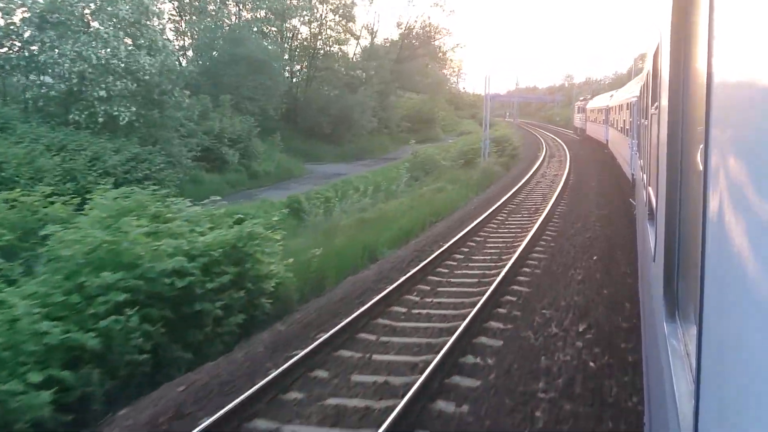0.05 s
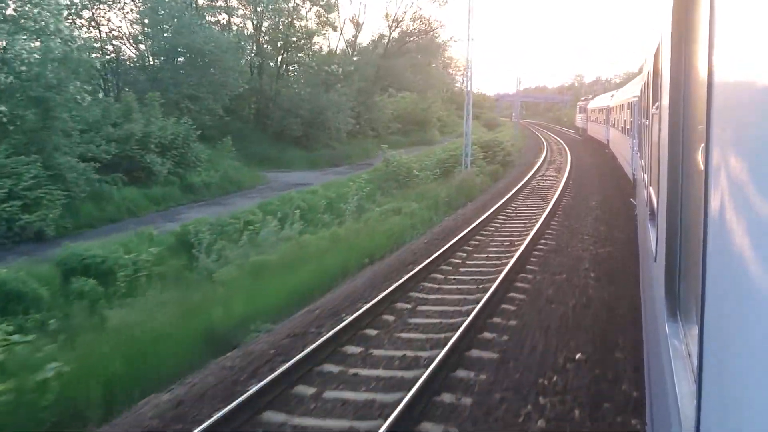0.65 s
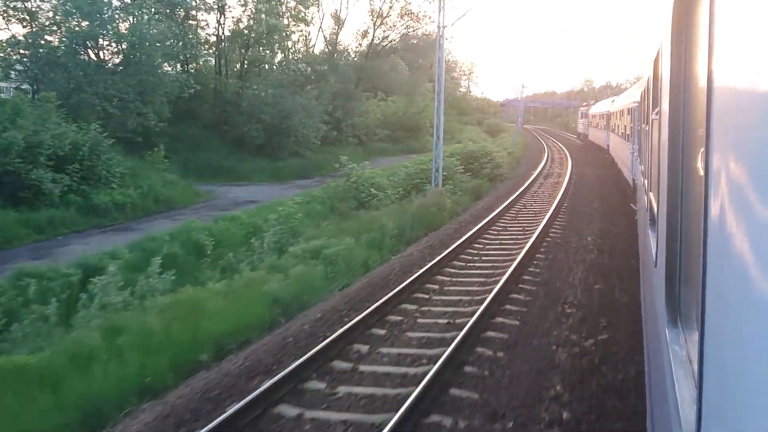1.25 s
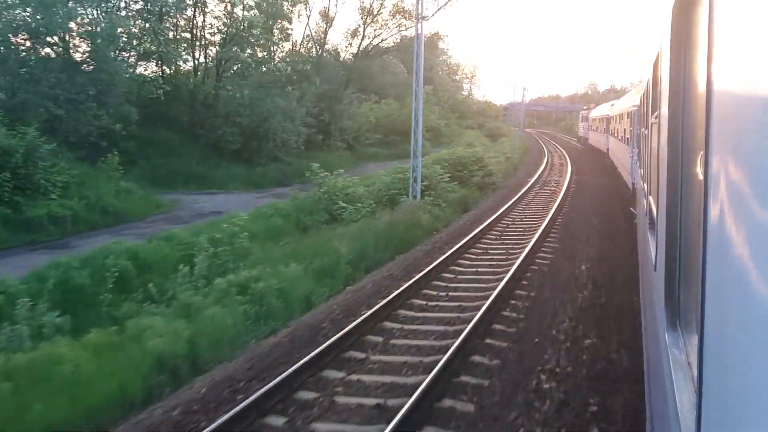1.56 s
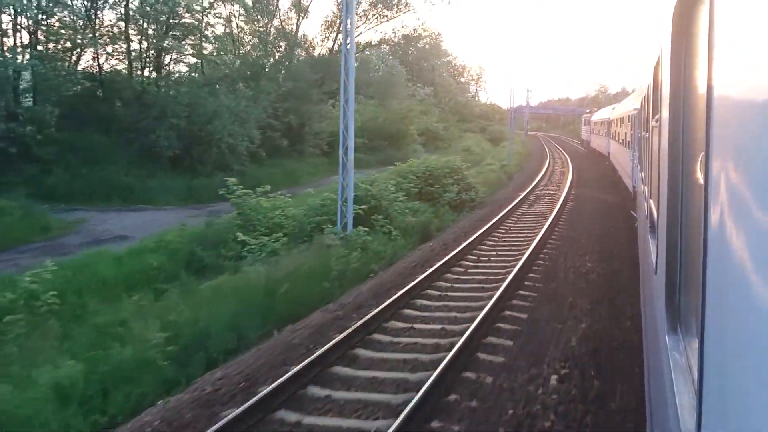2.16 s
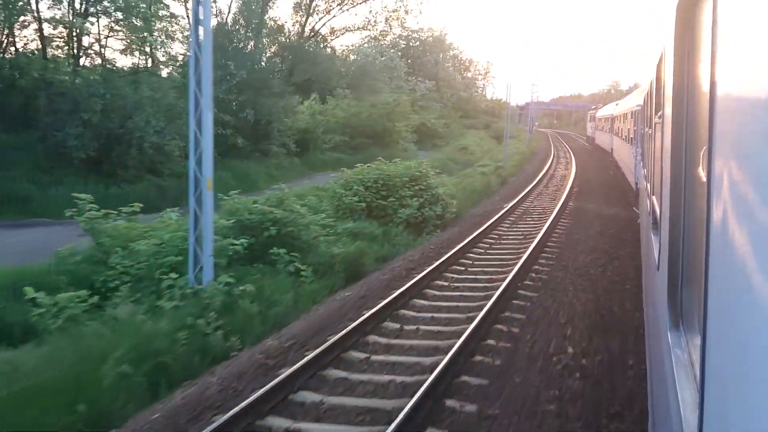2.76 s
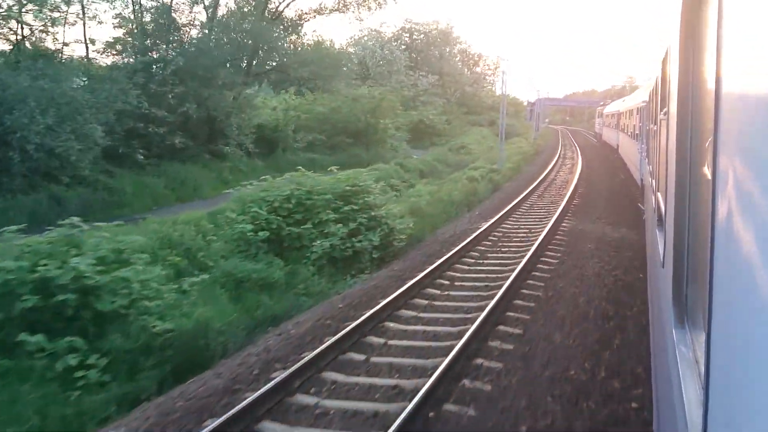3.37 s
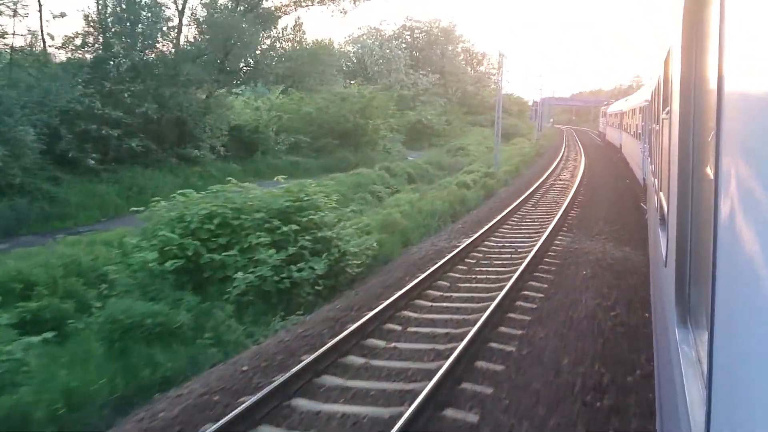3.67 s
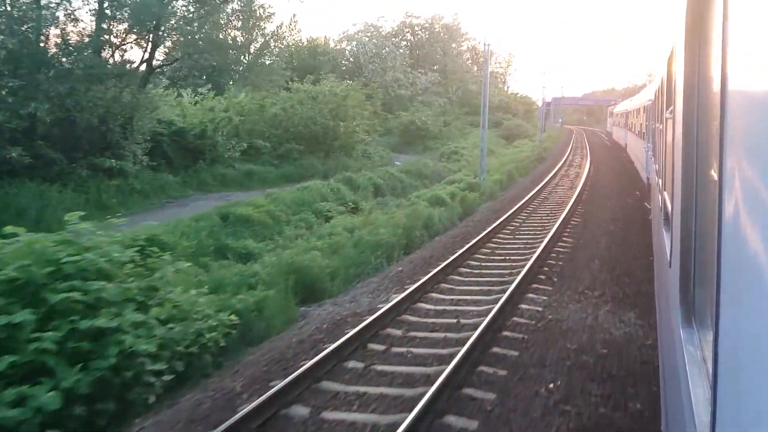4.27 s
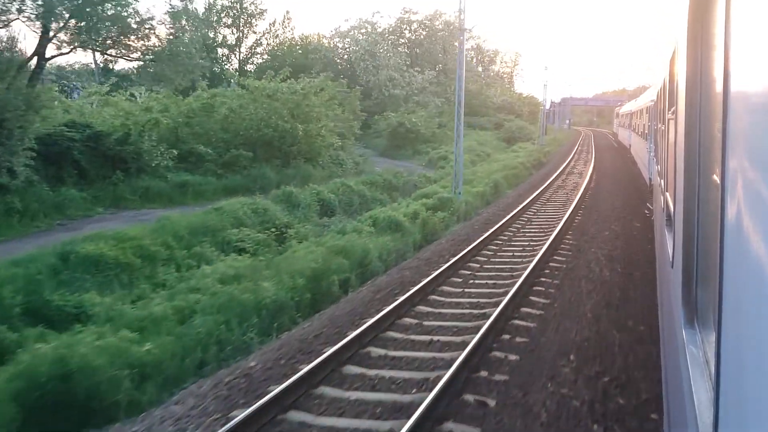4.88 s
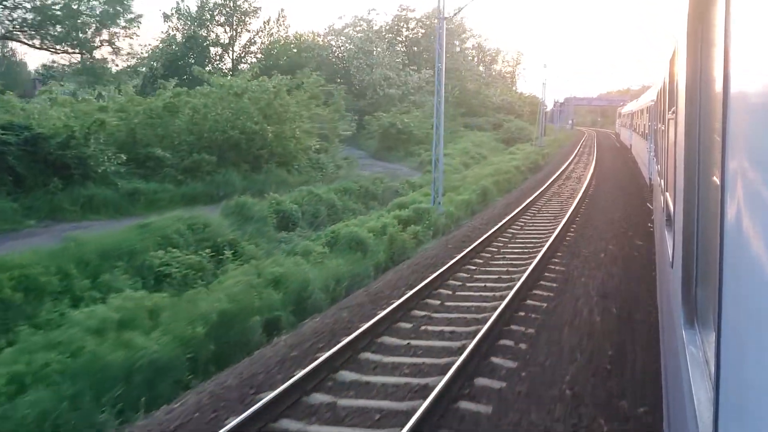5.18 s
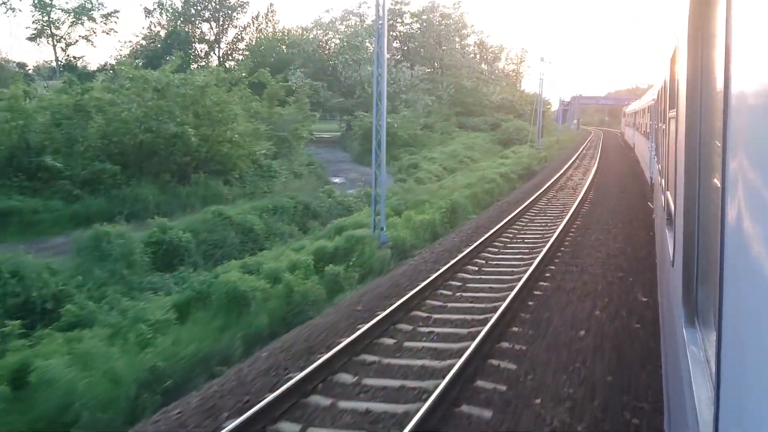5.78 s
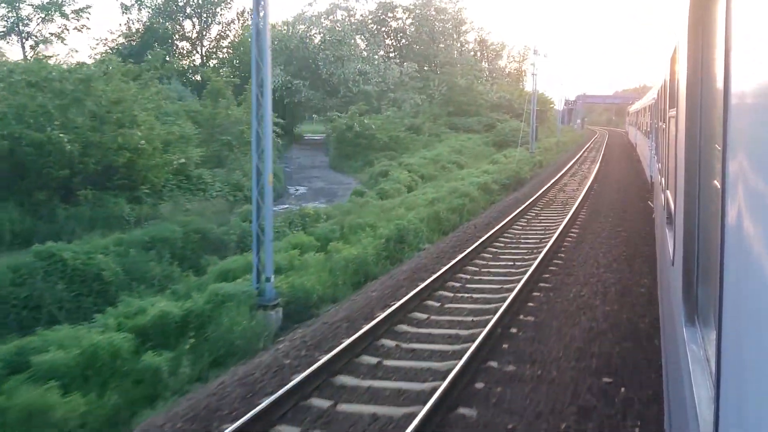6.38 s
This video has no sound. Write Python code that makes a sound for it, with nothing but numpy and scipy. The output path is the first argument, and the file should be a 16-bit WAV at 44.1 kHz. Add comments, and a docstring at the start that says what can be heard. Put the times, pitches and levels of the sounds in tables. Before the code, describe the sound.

Wind hits a microphone at an open train window in rapid, rumbling gusts and sharp slaps, strong on the left and much weaker on the right. Underneath, the train runs along the track with a continuous roar, hiss and slight ringing of wheels on rails. Toward the end a soft, wavering wheel tone rises, and a wheel rim brushes the rail twice with a faint sizzle.

```python
"""At the open window of a passenger train, rolling steadily through a curve.
The wheels roar and hiss on the rails and ring at their own pitches. Near the end one wheel sings softly,
and a flange (a wheel's guiding rim) brushes the rail with two faint, high sizzles.
Over it all, quick gusts thump, tear and slap at the left microphone of a camera held outside.
The right microphone is sheltered and catches only weaker swirls and puffs of air."""
import sys
import numpy as np
from scipy import signal
from scipy.fft import rfft, irfft, next_fast_len
from scipy.io import wavfile
from scipy.ndimage import uniform_filter1d, map_coordinates

SR = 44100
rng = np.random.default_rng(int(sys.argv[2]) if len(sys.argv) > 2 else 0)


def master(y):
    """Save y as 16-bit WAV."""
    cut = np.clip(np.atleast_2d(y).T, -1, 1)
    pcm = np.round(cut * 32767)  # scale
    wavfile.write(sys.argv[1], SR, pcm.astype(np.int16))


N = 292362
TIME = np.arange(N) / SR


def amp(db):
    """Turn decibels into a number to multiply by."""
    return 10 ** (np.asarray(db) / 20)


def unit(x):
    """Scale a signal to an average strength (rms) of 1."""
    return x / np.sqrt(np.mean(x ** 2) + 1e-20)


def along(points, hz):
    """Read between (frequency, value) points, giving each octave equal room."""
    freqs, values = np.transpose(points)
    return np.interp(np.log(hz + 1), np.log(freqs + 1), values)


def curves(rows):
    """Turn each column after the time into one value per sample."""
    times, *columns = np.transpose(rows)
    return [np.interp(TIME, times, column) for column in columns]


def bell(x, centre, width):
    """A smooth bump of height 1, down to about a third at one width from its centre."""
    return np.exp(-np.minimum(((x - centre) / width) ** 2, 20))


def wobble(rate):
    """A smooth curve through `rate` random values a second."""
    coarse = TIME[::16]
    points = rng.standard_normal(int(N * rate / SR) + 4)
    return np.interp(TIME, coarse, map_coordinates(points, [coarse * rate]))


def filtered(x, response):
    """Turn each frequency of x up or down by response(hz)."""
    size = next_fast_len(N + SR // 4)
    return irfft(rfft(x, size) * response(np.fft.rfftfreq(size, 1 / SR)), size)[..., :N]


def noise(spectrum):
    """Noise of strength 1 with the given tone colour."""
    return unit(filtered(rng.standard_normal(N), lambda hz: amp(along(spectrum, hz))))


def swirls(spectrum, span_s):
    """Swirling air: noise whose strength is evened out over span_s seconds."""
    air = noise(spectrum)
    size = max(int(span_s * SR), 2)
    power = uniform_filter1d(uniform_filter1d(air ** 2, size), size)
    return unit(air / np.sqrt(np.abs(power) + 0.076))


def arrival(spectrum, shares, lead_s):
    """Noise that both microphones hear, the left one lead_s sooner (later if negative)."""
    delay = lambda hz: np.exp(-1j * np.pi * hz * lead_s * np.array([[-1], [1]]))
    gain = lambda hz: amp(along(spectrum, hz)) * np.sqrt(np.abs(along(shares, hz)))
    return filtered(rng.standard_normal(N), lambda hz: gain(hz) * delay(hz))


# Wheel noise that comes straight, or bounces off the coach: (frequency [Hz], share of power [0-1])
STRAIGHT_SHARE = [(300, 0.52), (700, 0.72), (1200, 0.98), (1550, 0.53), (1900, 0.17), (2500, 0.49),
                  (3200, 0.13), (4500, 0.033)]
BOUNCED_SHARE = [(1800, 0.024), (2400, 0.074), (3600, 0.23), (4500, 0.26), (7000, 0.13), (11000, .03)]

def at_microphones(spectrum):
    """Stereo noise that arrives three ways: straight, bounced, and scattered from all around."""
    rest = lambda hz: np.clip(1 - along(STRAIGHT_SHARE, hz) - along(BOUNCED_SHARE, hz), 0, 1)
    white = rng.standard_normal((2, N))
    scattered = filtered(white, lambda hz: amp(along(spectrum, hz)) * np.sqrt(rest(hz)))
    straight = arrival(spectrum, STRAIGHT_SHARE, lead_s=-0.000058)
    bounced = arrival(spectrum, BOUNCED_SHARE, lead_s=0.000451)
    return unit(scattered + straight + bounced)


# Pitches at which wheels and rails ring: (pitch [Hz], width [Hz], typical boost [dB])
WHEEL_RINGS = [(479, 72.4, 3.5), (675, 33, 6), (1100, 39.2, 4), (1543, 43, 5.5), (1675, 68, 3.5),
               (1920, 47, 1.5), (2156, 35, 5), (2300, 55, 1.5), (2714, 120, 2), (3460, 100, 2),
               (3860, 150, 3), (4220, 84, 3.5), (4870, 170, 2)]

def ringing(rush, shimmer_db=3, swells_per_s=7):
    """Wheels and rails boost narrow bands of the noise; each band swells and fades on its own."""
    size = next_fast_len(N + SR // 4)
    spectrum, hz = rfft(rush, size), np.fft.rfftfreq(size, 1 / SR)
    ring = 0
    for centre, width, db in WHEEL_RINGS:
        band = irfft(spectrum * bell(hz, centre, width), size)[:, :N]
        ring = ring + (amp(db) - 1) * band * unit(amp(shimmer_db * wobble(swells_per_s)))
    return ring


# Sudden drops in the rolling noise: (time [s], depth [dB])
ROLLING_DIPS = [(0.02, 3), (0.425, 5.5), (1.78, 6.5), (2.31, 4.5), (2.501, 1.5), (3.06, 2.5), (3.44, 5),
                (3.87, 2), (4.19, 3.5), (4.57, 1.5), (5.545, 7), (6.18, 2)]

def dip_db(fall_s=0.01, recover_s=0.61):
    """The level drops quickly and creeps back; close dips pile up."""
    return -sum(depth * np.clip((TIME - start) / fall_s, 0, 1) * np.exp(-np.abs(TIME - start) / recover_s)
                for start, depth in ROLLING_DIPS)


# How loud the rolling is, before the dips: (time [s], relative level [dB])
ROLLING_LEVEL = [(0, -33), (0.4, -31.5), (0.6, -30.5), (1.5, -31.5), (1.85, -31.5), (2.25, -31.2),
                 (2.9, -31), (3.35, -32), (4.3, -34.5), (5.1, -35.5), (5.5, -34.5), (5.9, -35), (6.6, -35)]
# How its tone shifts along the curve: (time [s], amount of ringing [x], roar [dB], treble [dB])
ROLLING_TONE = [(0, 0.26, -2, -1), (0.9, 1.44, -0.5, 1.5), (1.6, 0.83, -3.5, 0.5), (2.6, 0.86, 0, 1.2),
                (3.25, 1.1, 0.5, 0), (3.7, 1.06, -1.5, 1), (4.6, 0.99, -0.5, -4), (5.4, 1, 2, -2.5),
                (5.9, 0.9, 1, -1.5), (6.6, 1.07, 2, -4)]
# Tone colours of the low roar and of the hiss: (frequency [Hz], relative level [dB])
ROAR_COLOUR = [(25, -30), (60, -9), (120, 1.5), (250, -3), (430, 1), (700, -8.5), (900, -8), (1400, -26),
               (4000, -78)]
HISS_COLOUR = [(300, -3.5), (700, 2.5), (1000, -1), (1500, 2.5), (2200, 1.5), (2500, 0.2), (3100, -2),
               (4000, -3), (5000, -5.5), (6000, -9.5), (7000, -19), (8500, -19.5), (10500, -13.5),
               (13500, -17.5), (15700, -27)]
# Which side hears more hiss: (frequency [Hz], left minus right [dB])
HISS_BALANCE = [(800, -0.5), (1600, 2.5), (2400, -1), (3200, -2), (4000, -3.5), (5000, -3.5), (6300, -3),
                (8000, -2.5), (10000, -7), (12000, -4), (14500, 0)]

def rolling(hiss_db=4, roar_db=3, unrest_db=0.45):
    """Rough rails shake the track and wheels, making a low roar and a hiss that both ring."""
    level_db = curves(ROLLING_LEVEL)[0] + dip_db()
    ring_amount, extra_roar_db, treble_db = curves(ROLLING_TONE)
    sides = np.array([[.5], [-.5]])
    hiss = filtered(at_microphones(HISS_COLOUR), lambda hz: amp(along(HISS_BALANCE, hz) * sides))
    treble = filtered(hiss, lambda hz: hz ** 2 / (hz ** 2 + 7000 ** 2))
    hiss = hiss + (amp(treble_db) - 1) * treble
    roar = at_microphones(ROAR_COLOUR)
    rush = amp(hiss_db) * hiss + amp(roar_db + extra_roar_db) * roar
    return amp(level_db + unrest_db * wobble(25)) * (rush + ring_amount * ringing(rush))


# One wheel tone that grows as the curve goes on: (time [s], level [dB], pitch [Hz])
WHEEL_SONG = [(0, -70, 2250), (4.2, -60, 2265), (5.3, -45, 2242), (5.52, -53, 2272), (5.6, -51, 2286),
              (5.83, -38.5, 2260), (5.88, -49, 2260), (5.95, -40.5, 2262), (6.08, -41, 2320),
              (6.2, -49, 2230), (6.36, -45, 2236), (6.44, -41, 2260), (6.52, -37, 2310), (6.57, -49, 2350),
              (6.61, -40, 2266)]

def singing_wheel(width_hz=145, waver_db=1.5):
    """A vibrating wheel sings a blurred, wavering note that never settles into a squeal."""
    level_db, pitch_hz = curves(WHEEL_SONG)
    blur = filtered(rng.standard_normal((2, 3, N)), lambda hz: bell(hz, 0, width_hz))
    phase = 2 * np.pi * np.cumsum(pitch_hz) / SR
    tones = blur[0] * np.cos(phase) + blur[1] * np.sin(phase)  # shared, left only, right only
    return amp(level_db + waver_db * wobble(16)) * unit(tones[0] + tones[1:])


# The flange touches the rail: (start [s], length [s], level [dB], pitch [Hz], width [Hz])
FLANGE_TOUCHES = [(5.379, 0.1, -50.5, 12310, 1500), (5.962, 0.04, -48, 12200, 850)]

def flange_sizzle(right_db=-6, grain_db=3.0, rise_s=0.055, fade_s=0.08):
    """A very high, grainy sizzle swells as the flange rubs the rail and fades as it lets go."""
    sizzle = 0
    for start, length, db, centre_hz, width_hz in FLANGE_TOUCHES:
        band = unit(filtered(rng.standard_normal(N), lambda hz: bell(hz, centre_hz, width_hz)))
        rise = np.clip(.5 + (TIME - start) / rise_s, 0, 1)
        fade = np.exp(-np.maximum(TIME - start - length, 0) / fade_s)
        sizzle = sizzle + amp(db) * rise * fade * band
    return sizzle * amp(grain_db * wobble(70)) * amp([[0], [right_db]])


# The breeze and the single puffs on the sheltered side: (time [s], relative level [dB])
SHELTERED_BREEZE = [(0, -34), (0.95, -28), (1.6, -35), (2.3, -35), (3.4, -34), (3.55, -45), (3.9, -32),
                    (5.4, -35), (6.15, -31), (6.6, -41)]
SHELTERED_PUFFS = [(0.41, -30), (0.74, -31), (1.1, -22), (1.38, -23.5), (1.77, -21), (1.9, -24),
                   (2.06, -17.5), (2.2, -18.5), (2.41, -27), (2.66, -23.5), (2.79, -29), (2.99, -13.5),
                   (3.14, -26), (3.3, -32), (3.43, -32), (4.21, -29), (4.41, -34), (4.71, -24), (4.99, -24),
                   (5.17, -26), (5.25, -22.5), (5.43, -25), (5.7, -31), (6.0, -28), (6.3, -28)]
# Their tone colour: (frequency [Hz], relative level [dB])
SHELTERED_COLOUR = [(12, -55), (25, -25), (35, -39), (50, 0.5), (65, 4.5), (100, -5), (160, -0.5),
                    (300, -7.5), (600, -14), (1200, -27), (4000, -73)]

def sheltered_wind(level_db=-0.5, swing_db=-1.0, puff_half_s=0.041):
    """Weaker swirls curl round to the right microphone, now and then in a puff."""
    breeze_db, = curves(SHELTERED_BREEZE)
    breeze_power = amp(breeze_db + swing_db * wobble(10)) ** 2
    puff_power = sum(amp(db) ** 2 * bell(TIME, time, puff_half_s) for time, db in SHELTERED_PUFFS)
    return amp(level_db) * np.sqrt(breeze_power + puff_power) * swirls(SHELTERED_COLOUR, span_s=0.077)


# Lulls in the wind on the left: (time [s], half length [s], depth [dB])
WIND_LULLS = [(0.503, 0.018, 8), (0.572, 0.015, 10), (0.677, 0.015, 6), (1.036, 0.036, 7.5),
              (1.258, 0.022, 4), (1.503, 0.02, -0.5), (1.86, 0.048, 6), (2.07, 0.044, 4), (2.608, 0.028, 5),
              (2.797, 0.018, -1.5), (2.973, 0.023, 9), (3.147, 0.012, 3), (3.517, 0.022, 1),
              (4.14, 0.04, 3), (4.823, 0.024, -0.5), (4.938, 0.016, 5), (5.085, 0.024, 2.5),
              (5.163, 0.026, 5), (5.271, 0.018, -3), (5.745, 0.032, 2.5), (6.153, 0.02, 5),
              (6.559, 0.039, -2)]

def lull_db():
    """The wind eases off smoothly and returns; a negative depth makes a small swell instead."""
    return -sum(depth * bell(TIME, time, half_length) for time, half_length, depth in WIND_LULLS)


# The air that keeps streaming past the train: (time [s], relative level [dB])
AIRSTREAM = [(0, -1), (0.55, 2.5), (1.2, 0), (1.6, -2), (1.86, -0.5), (2.3, -1), (2.62, -4), (2.95, 0.5),
             (3.08, 1.5), (3.75, 2.5), (4.05, 2), (4.4, 1), (5.1, -3), (5.8, 1), (6.6, -1.5)]
# Strong gusts on the left: (start [s], length [s], relative thump [dB], relative tear [dB], pace [Hz])
WIND_GUSTS = [(0.026, 0.047, -14.5, -21.5, 98.3), (0.108, 0.016, -14.5, -23, 140.2),
              (0.173, 0.044, -31, -25, 138.7), (0.24, 0.057, -15.5, -27, 85.9),
              (0.316, 0.032, -23, -25.5, 96.1), (0.395, 0.051, -15.5, -26, 117.6),
              (0.594, 0.017, -17, -32, 124), (0.627, 0.031, -20, -26.5, 152.2),
              (0.7, 0.039, -13.5, -30, 109.7), (0.75, 0.061, -17, -47, 89.6),
              (0.864, 0.025, -13, -23, 162.6), (0.907, 0.014, -16.5, -32.0, 157.6),
              (0.942, 0.03, -16.5, -25, 107.6), (0.985, 0.019, -20, -23.5, 145.9),
              (1.089, 0.035, -19.5, -27.5, 96.2), (1.137, 0.025, -14, -27, 92.94),
              (1.281, 0.029, -14.5, -25, 102.8), (1.329, 0.027, -16, -29, 118.7),
              (1.367, 0.038, -16, -22.5, 88.6), (1.431, 0.034, -14, -33, 115.3),
              (1.526, 0.031, -16, -41, 112.1), (1.653, 0.064, -17, -26, 88.16),
              (1.727, 0.032, -23, -23, 158.9), (1.779, 0.03, -13.5, -23, 154.7),
              (1.969, 0.026, -14, -24.5, 116.6), (2.192, 0.027, -19, -34, 128.6),
              (2.234, 0.049, -19, -26, 118.2), (2.292, 0.033, -15, -27.5, 93.3),
              (2.336, 0.031, -17, -29, 104.1), (2.394, 0.026, -13.5, -40, 114),
              (2.43, 0.046, -15, -30, 88.2), (2.503, 0.039, -13, -23, 86.45),
              (2.544, 0.035, -23.5, -49, 86.3), (2.697, 0.05, -15, -48, 96.3),
              (2.815, 0.069, -19.5, -34, 129.1), (2.921, 0.049, -27, -26.5, 91.2),
              (3.01, 0.061, -19, -22.5, 115.4), (3.091, 0.041, -30, -26, 140.6),
              (3.17, 0.069, -16.5, -23.5, 89.8), (3.249, 0.023, -23, -24.5, 115.7),
              (3.3, 0.023, -17.5, -31, 133.4), (3.343, 0.036, -18, -24, 117.2),
              (3.401, 0.023, -15, -26, 127.1), (3.448, 0.022, -13, -38, 87.56),
              (3.534, 0.056, -17.5, -26.5, 106), (3.629, 0.06, -17, -26.5, 125.4),
              (3.7, 0.021, -17, -32.0, 109), (3.742, 0.045, -16.5, -26.5, 110.7),
              (3.833, 0.063, -14, -25, 101.1), (3.922, 0.02, -18, -20, 97.9),
              (3.972, 0.073, -13.5, -20.5, 112.3), (4.047, 0.034, -18, -23.5, 132),
              (4.201, 0.0533, -14.5, -23, 115.5), (4.285, 0.054, -16.5, -22.5, 101.8),
              (4.388, 0.059, -19, -23.5, 107.6), (4.457, 0.035, -16.5, -24.5, 105.2),
              (4.551, 0.062, -17, -25.5, 124), (4.696, 0.043, -14.5, -28, 113.9),
              (4.752, 0.027, -16, -25, 133.9), (4.852, 0.046, -14.5, -28.5, 125.5),
              (4.954, 0.023, -16.5, -29.5, 132.4), (5.012, 0.03, -22, -28, 128.9),
              (5.117, 0.027, -20, -26.5, 115.2), (5.202, 0.061, -19, -31, 110.9),
              (5.313, 0.066, -19, -26, 104.8), (5.47, 0.041, -18, -23, 154.8),
              (5.522, 0.037, -15, -23.5, 114.2), (5.566, 0.026, -17, -31, 98.7),
              (5.615, 0.074, -39, -28, 130.2), (5.775, 0.025, -21, -45, 114.6),
              (5.85, 0.079, -18.5, -24.5, 106.8), (5.933, 0.07, -23, -28, 103.5),
              (6.008, 0.035, -15.0, -22.5, 117.2), (6.05, 0.066, -34, -28.5, 101.4),
              (6.176, 0.061, -15.5, -20.5, 124.6), (6.283, 0.035, -19, -18.5, 128.7),
              (6.348, 0.035, -15.5, -23, 104.9), (6.388, 0.044, -19.5, -26.5, 106.1),
              (6.512, 0.04, -35, -35, 94.4)]

def gust_strengths(rise_s=0.011, fall_s=0.021, sag_db_per_s=38, stream_thump_db=-23.5,
                   stream_tear_db=-33.5):
    """How hard the wind thumps and tears: each gust rises, sags and dies over the restless stream."""
    stream_db, = curves(AIRSTREAM)
    stream = amp(stream_db + 3 * np.minimum(wobble(28), 1))
    flap = amp(np.minimum(wobble(50), 1))  # gusts flap by about 1 dB
    coarse = TIME[::64]
    power = 0
    for start, length, thump_db, tear_db, _ in WIND_GUSTS:
        rise = np.clip(.5 + (coarse - start) / rise_s, 0, 1)
        fall = np.clip(.5 + (start + length - coarse) / fall_s, 0, 1)
        sag = amp(-sag_db_per_s * np.clip(coarse - start, 0, length))
        power = power + (rise * sag * fall * amp([[thump_db], [tear_db]])) ** 2
    thump, tear = [flap * np.sqrt(np.interp(TIME, coarse, row)) for row in power]
    return np.hypot(thump, amp(stream_thump_db) * stream), np.hypot(tear, amp(stream_tear_db) * stream)


# Tone colour of the thump at normal pace: (frequency [Hz], relative level [dB])
THUMP_COLOUR = [(12, -45), (30, -17), (50, -1.5), (65, 2), (100, -2.5), (150, -5.5), (230, -10), (330, -22),
                (600, -35.5), (1500, -100)]

def large_swirls(normal_pace_hz=112.1):
    """Large swirls make a deep rumble that runs slower or faster with the pace of each gust."""
    edges = [(start + length * end, hz) for start, length, _, _, hz in WIND_GUSTS for end in (0, 1)]
    speed = curves(sorted(edges))[0] / normal_pace_hz
    rumble = swirls(THUMP_COLOUR, span_s=0.027)
    return map_coordinates(rumble, [np.cumsum(speed)], order=3, mode='mirror')


# Tone colours of the tearing and of the crackle: (frequency [Hz], relative level [dB])
TEAR_COLOUR = [(100, -66), (200, -8.5), (270, 0), (400, -3), (550, -7), (700, -13.5), (900, -17),
               (1300, -30), (2200, -30.5), (4000, -61), (9000, -80)]
CRACKLE_COLOUR = [(300, -3), (700, 9), (1100, 5), (1700, -16), (2600, -22), (4500, -34), (9000, -60)]

def gusting_wind(thump_db=6.5, tear_db=7, sputter_db=3.0, ride_db=4.0, crackle_db=-7.5):
    """Gusts hit the left microphone: large swirls thump, and small ones tear in short sputters."""
    thump, tear = gust_strengths()
    large = large_swirls()
    # small swirls ride on the pressure peaks of the large ones
    sputter = unit(amp(sputter_db * np.clip(wobble(170), -2, 1.5) + ride_db * np.minimum(abs(large), 2)))
    small = amp(tear_db) * tear * swirls(TEAR_COLOUR, span_s=0.02)
    # crackle grows with the square of the strength, so only the hardest gusts are bright
    crackle = amp(crackle_db) * tear ** 2 / tear.max() * noise(CRACKLE_COLOUR)
    flutter = unit(amp(1.3 * np.tanh(wobble(90))))
    return amp(lull_db()) * flutter * (amp(thump_db) * thump * large + sputter * (small + crackle))


# Sudden slaps of air: (time [s], relative thud [dB], fade [s], relative crack [dB])
AIR_SLAPS = [(0.463, -4.5, 0.0083, -27), (0.63, -6, 0.0052, -30), (0.646, -6, 0.006, -30),
             (0.992, -8, 0.005, -26), (1.31, -0.5, 0.0065, -22), (1.43, -9, 0.0044, -28),
             (1.688, -2.5, 0.01, -10), (1.725, -6, 0.006, -24), (1.741, -7, 0.0071, -24),
             (1.779, -4, 0.0094, -22), (1.797, -5, 0.0049, -16), (1.979, -5.5, 0.0082, -17),
             (2.19, -6.5, 0.0085, -24), (2.334, -4.5, 0.01, -14.5), (2.354, -5.5, 0.0063, -21),
             (2.51, -10.5, 0.0093, -15), (2.857, -5, 0.0041, -34), (2.883, -7, 0.0031, -35),
             (3.016, -11, 0.0087, -30), (3.054, -6, 0.0095, -18), (3.259, -8, 0.0071, -28),
             (3.413, -8, 0.0076, -26), (3.772, -9, 0.0053, -21), (3.927, -10, 0.0096, -32),
             (3.963, -12, 0.0059, -29), (4.198, -5.5, 0.0098, -30), (4.302, -6, 0.0072, -27),
             (4.343, -7, 0.0047, -29), (4.42, -5, 0.005, -25), (4.578, -1.5, 0.0088, -25),
             (4.76, -10, 0.0072, -36), (4.968, -15, 0.0047, -32), (5.038, -2.5, 0.0036, -20),
             (5.552, -3, 0.0043, -34), (5.637, -22, 0.006, -34), (5.776, -9, 0.0031, -36),
             (5.832, -12, 0.0049, -33), (5.874, -14, 0.0079, -27), (6.177, -10, 0.0044, -28),
             (6.186, -15, 0.0035, -29), (6.209, -7, 0.0043, -23), (6.224, 0, 0.0045, -23),
             (6.26, -3, 0.0048, -27), (6.296, -3, 0.0098, -19.5), (6.373, -5.5, 0.006, -28)]
# Tone colours of a slap's thud and crack: (frequency [Hz], relative level [dB])
THUD_COLOUR = [(40, -34), (100, -4), (250, 6.5), (500, -0.5), (800, -7), (1300, -20), (2300, -45),
               (4000, -49), (9000, -75)]
CRACK_COLOUR = [(400, -32), (900, 6), (1500, -2), (2300, -6.5), (3200, -17), (6000, -45), (9000, -70)]

def air_slaps(level_db=-2, rise_s=0.0016):
    """A swirl bursts right on the left microphone: a sharp, short thud, sometimes with a clear crack."""
    age = np.arange(SR // 10) / SR
    force = np.zeros((2, N + SR))
    for start, thud_db, fade_s, crack_db in AIR_SLAPS:
        burst = (1 - np.exp(-age / rise_s)) * np.exp(-age / fade_s)
        first = round(start * SR)
        force[:, first:first + len(age)] += amp([[thud_db], [crack_db]]) * burst
    thud, crack = amp(level_db) * force[:, :N]
    return thud * swirls(THUD_COLOUR, span_s=0.0029) + crack * swirls(CRACK_COLOUR, span_s=0.0027)


def scene():
    """Both microphones hear the train; each has its own wind."""
    train = rolling() + singing_wheel() + flange_sizzle()
    left_wind = gusting_wind() + air_slaps()
    return train + np.array([left_wind, sheltered_wind()])


# Treble bands that the microphone openings weaken: (frequency [Hz], width [Hz], left [dB], right [dB])
MIC_NOTCHES = [(7440, 190, -13, -12), (9010, 320, -21, -5)]

def record(dry, low_cut_hz=37.0, top_hz=15750, ceiling=0.92):
    """The camera cuts the deepest rumble, rounds off strong gusts and loses parts of the treble."""
    cut = signal.sosfilt(signal.butter(6, low_cut_hz, 'highpass', fs=SR, output='sos'), dry)
    rounded = cut / (1 + (cut / ceiling) ** 4) ** (1 / 4)
    notch_db = lambda hz: sum(bell(hz, centre, width) * np.array([[left], [right]])
                              for centre, width, left, right in MIC_NOTCHES)
    return filtered(rounded, lambda hz: amp(notch_db(hz)) * (hz < top_hz))


dry = scene()
out = record(dry)
master(out)
```